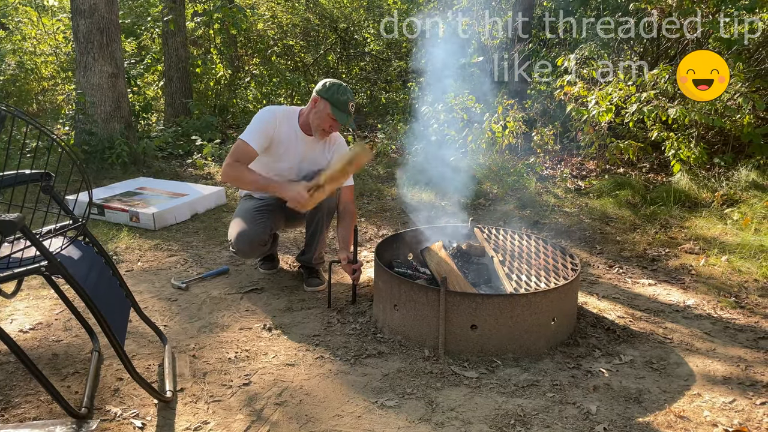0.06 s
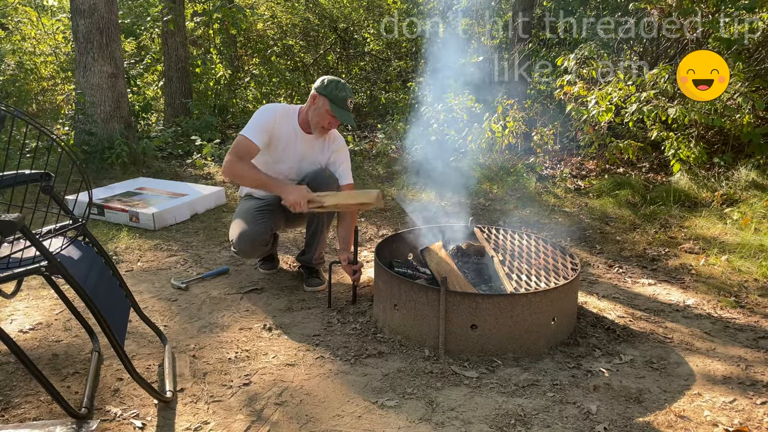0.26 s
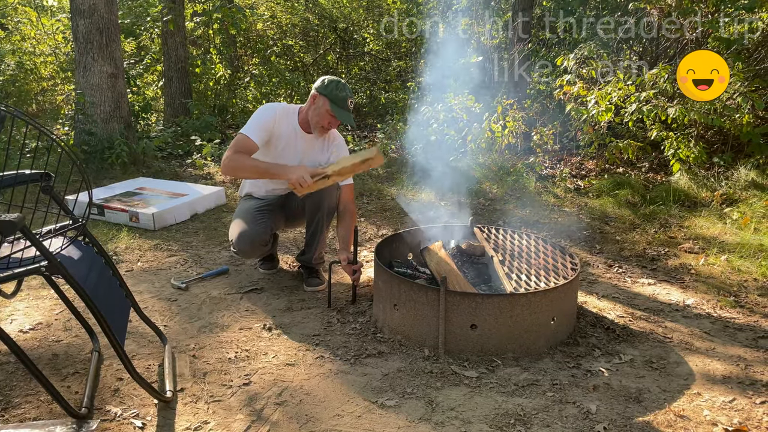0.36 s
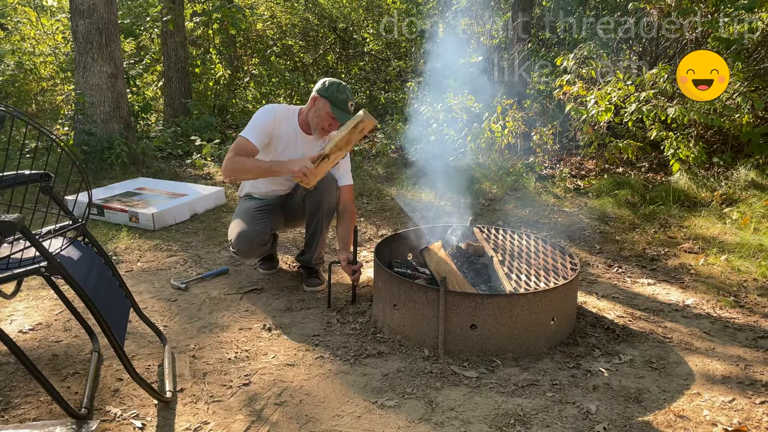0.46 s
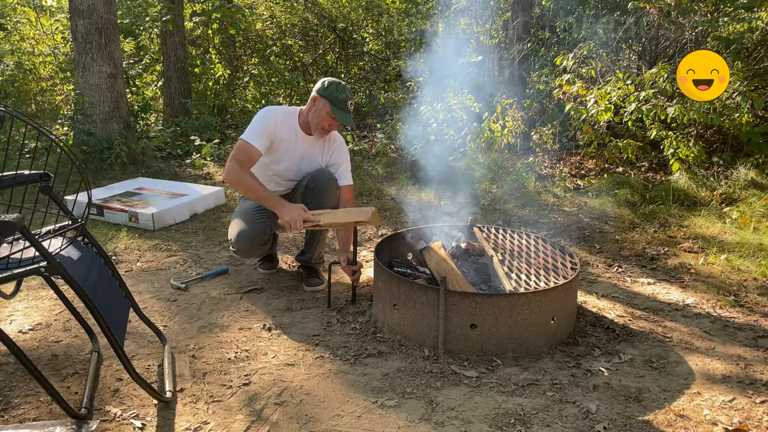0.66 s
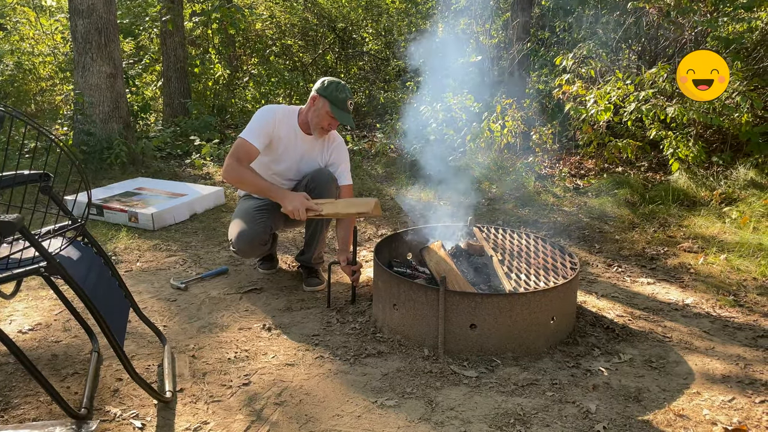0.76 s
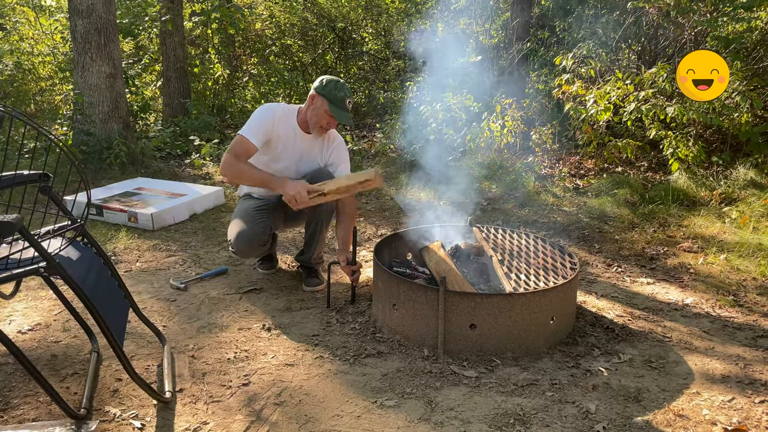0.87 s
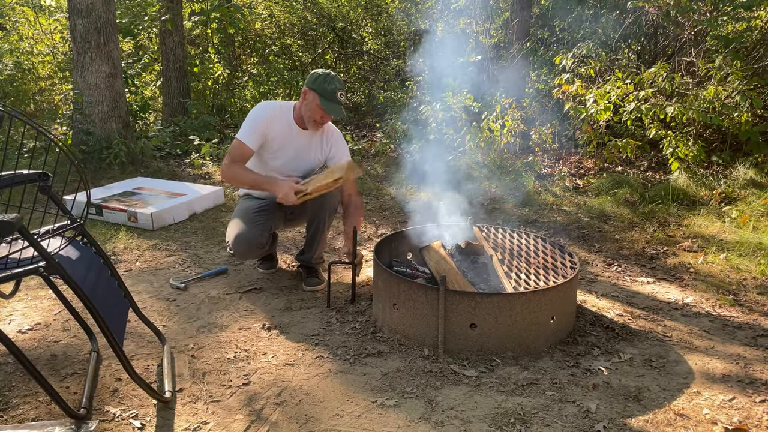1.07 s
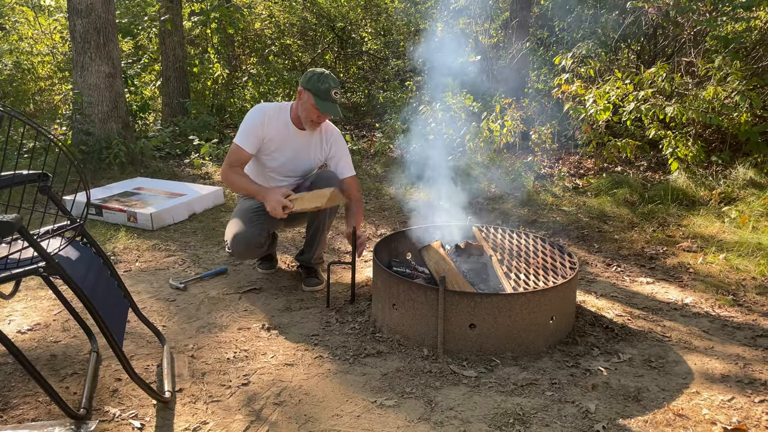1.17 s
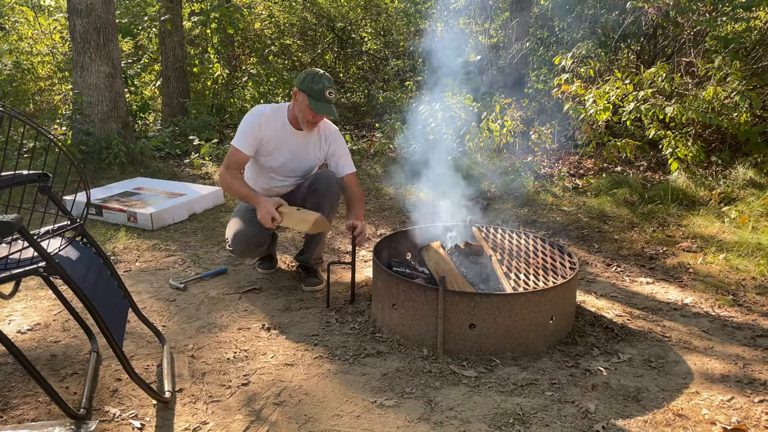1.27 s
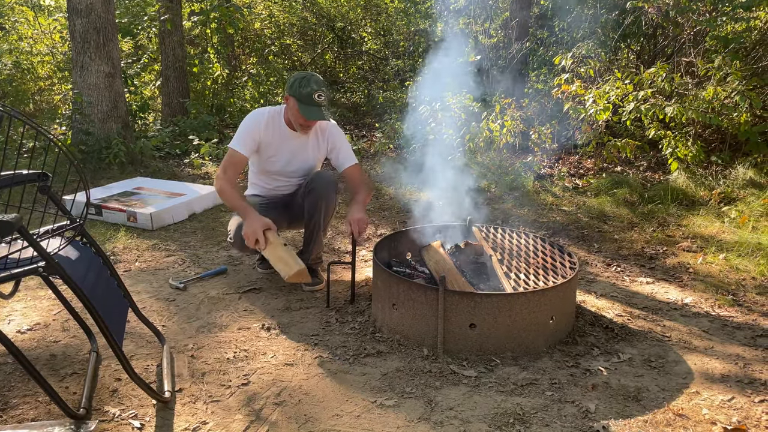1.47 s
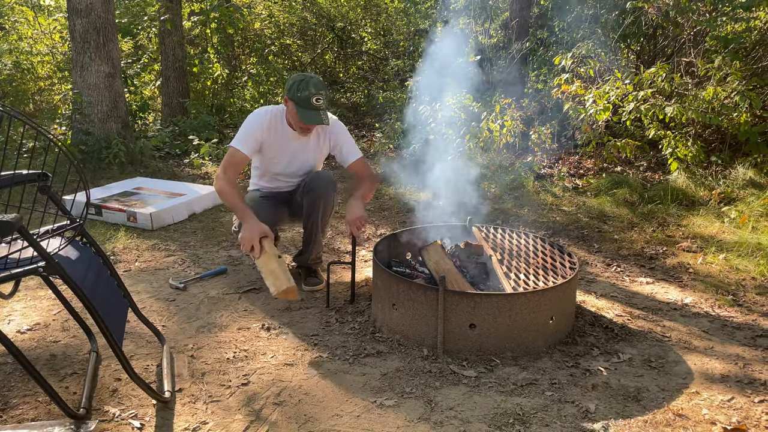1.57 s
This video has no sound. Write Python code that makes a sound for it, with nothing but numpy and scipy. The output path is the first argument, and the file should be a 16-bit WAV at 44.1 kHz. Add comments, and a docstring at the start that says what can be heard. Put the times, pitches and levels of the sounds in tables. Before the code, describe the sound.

A split log strikes a steel stake twice, half a second apart, the first blow brighter with a brief metallic ring; close, slightly overloaded microphone, short woodland echo, faint fire pops and crickets.

```python
"""Crickets chirr and a campfire ticks over a low rumble; they last throughout.
A split log knocks on a steel stake and drives it into the soil: the log clacks, the stake rings briefly,
the ground thuds and the trees answer. A faint scuff, a thin pop and a sharp snap of the fire lead to a
second knock; more pops and handling bumps follow. Struck bodies are decaying sines; the rest is shaped
noise. The blows are hard enough to overload the microphone."""
import sys
import numpy as np
from scipy import signal
from scipy.fft import rfft, irfft, next_fast_len
from scipy.io import wavfile
from scipy.ndimage import map_coordinates

SR = 44100
rng = np.random.default_rng(int(sys.argv[2]) if len(sys.argv) > 2 else 0)


def dump_mix(stems):
    """Bounce the given channels to the path in sys.argv[1] as a 16-bit WAV at rate SR."""
    frames = np.atleast_2d(stems).T  # one column per channel
    limited = np.clip(frames, -1, 1)  # hard clip at full scale
    pcm = np.round(limited * 32767).astype(np.int16)
    wavfile.write(sys.argv[1], SR, pcm)


N = 70560  # length in samples


def amp(db):
    """Turn decibels into linear gain."""
    return 10 ** (np.asarray(db) / 20)


def unit(x):
    """Scale to an rms of 1."""
    return x / np.sqrt(np.mean(x ** 2) + 1e-20)


def along(points, hz):
    """Interpolate (pitch_hz, value) points on a log frequency axis."""
    point_hz, value = np.transpose(points)
    return np.interp(np.log(hz + 1), np.log(point_hz + 1), value)


def colour(points):
    """Make a gain function of frequency from (pitch_hz, level_db) points."""
    return lambda hz: amp(along(points, hz))


def filtered(x, response):
    """Multiply the spectrum of x by a response, zero-padded against wrap-around."""
    size = next_fast_len(N + SR // 2)
    spectrum = rfft(x, size) * response(np.fft.rfftfreq(size, 1 / SR))
    return irfft(spectrum, size)[..., :N]


def noise(gain, spread):
    """Coloured stereo noise of rms 1; spread is the ratio of side to mid."""
    mid, side = filtered(rng.standard_normal((2, N)), gain)
    return unit(np.array([mid + spread * side, mid - spread * side]))


def wobble(rate):
    """A smooth random curve with the given number of knots per second."""
    knots = rng.standard_normal(int(N * rate / SR) + 4)
    return map_coordinates(knots, [np.arange(N) * rate / SR])


def since(start_s):
    """Seconds elapsed after start_s, zero before it."""
    return np.maximum(np.arange(N) / SR - start_s, 0)


def strike(start_s, attack_s, t60_s):
    """Envelope of a hit: a quick rise times an exponential decay of 60 dB in t60_s."""
    t = since(start_s)
    rise = 1 - np.exp(-t / attack_s)
    return rise * amp(-60 * t / t60_s)


def ring(modes, start_s, attack_s, tilt_db):
    """Damped sine modes of a struck body; a harder contact favours the high ones."""
    out = np.zeros(N)
    for hz, level_db, t60_s in modes:
        octaves = np.log2(max(hz / 900, 1))
        mode_db = level_db + rng.normal(0, 0.4) + tilt_db * octaves
        tone = np.sin(2 * np.pi * hz * since(start_s))
        out += amp(mode_db) * strike(start_s, attack_s, t60_s) * tone
    return out


def knocks():
    """Each blow is a graze and a noisy crack, then the modes of log, stake and soil ring."""
    # the blows: start_s, strength_db, stake_ring_db, crack_db, brightness_db_per_octave, log_pitch_ratio
    blows = [(0.2124, 1.5, 0, -4, 1.5, 0.996), (0.7311, 1, -7, -7, -0.5, 1.02)]
    # modes before brightness and blow strength: pitch_hz, level_db, t60_s
    log_modes = [(289.6, 8, 0.026), (325.8, 0.5, 0.039), (534.2, 16, 0.017), (644.6, 17.5, 0.015),
                 (828, 14.5, 0.016), (1440, -9.5, .023), (1429.4, 4, 0.021), (2274, 5, 0.011),
                 (3521, -18, 0.015)]  # pitch also shifts with each blow
    stake_modes = [(1205, -19, 0.091), (1623, -4.5, 0.039), (2822, -9, 0.025), (2858, -46.5, 0.18),
                   (2900, -43, 0.42), (4346, -8.5, 0.006), (6000, -30.5, 0.054)]  # damped by soil and hand
    soil_modes = [(73.5, -15, 0.19), (122, -7.5, 0.094), (171.2, -10, .1)]
    # colour of the crack: pitch_hz, level_db
    crack_colour = [(200, 8.5), (1000, 4.5), (2500, 1), (5500, -7.5), (8000, -14.5), (9500, -8.5),
                    (12000, -20.5), (15000, -24)]
    log_attack_s, stake_attack_s, soil_attack_s = 0.005, 0.0003, 0.014
    crack_t60_s = 0.019
    graze_lead_s, graze_db = 0.0017, -20  # splinters touch just before the full blow

    out = np.zeros((2, N))
    for start_s, strength_db, stake_db, crack_db, tilt_db, pitch_ratio in blows:
        shifted_log = [(hz * pitch_ratio, level_db, t60_s) for hz, level_db, t60_s in log_modes]
        log = ring(shifted_log, start_s, log_attack_s, tilt_db)
        stake = amp(stake_db) * ring(stake_modes, start_s, stake_attack_s, tilt_db)
        soil = ring(soil_modes, start_s, soil_attack_s, tilt_db)
        full_contact = amp(crack_db) * strike(start_s, 0.000071, crack_t60_s)
        graze = amp(graze_db) * strike(start_s - graze_lead_s, 0.00098, crack_t60_s)
        crack = (full_contact + graze) * noise(colour(crack_colour), spread=0.59)
        out += amp(strength_db) * (log + stake + crack + soil)
    return out


def fire():
    """Burning wood as short noise bursts: one sharp snap, thin pops and faint random ember ticks."""
    # thin pops: start_s, level_db
    pops = [(0.6368, -49), (0.8003, -43), (.954, -39.5), (1.085, -41.5), (1.135, -50), (1.274, -45),
            (1.294, -46)]
    # colour of snap and pops: pitch_hz, level_db
    pop_colour = [(300, -24.5), (1000, -25.5), (1700, -3.5), (6000, -1), (9000, -5), (12000, -8),
                  (16000, -22)]
    snap_s, snap_db, snap_t60_s = 0.6992, -19, 0.012
    pop_t60_s = 0.024
    thin_hz = 6044  # pops and embers lack the lower part of the sound
    embers_per_s, ember_floor_db = 32, -65.5

    count = int(embers_per_s * N / SR)
    embers = [(u * N / SR, ember_floor_db + 8 * v) for u, v in rng.random((count, 2))]
    snap = amp(snap_db) * strike(snap_s, 0.000296, snap_t60_s) * noise(colour(pop_colour), spread=0.56)
    ticks = sum(amp(level_db) * strike(start_s, 0.00015, pop_t60_s) for start_s, level_db in pops + embers)
    thin_noise = noise(lambda hz: colour(pop_colour)(hz) * hz / (hz + thin_hz), spread=0.9)
    return snap + ticks * thin_noise


def ports(x, lag_s):
    """Phase shift by frequency: sound reaches the left microphone port first, the right lag_s later."""
    side = np.array([[1], [-1]])
    return filtered(x, lambda hz: np.exp(1j * np.pi * hz * lag_s * side))


def woods(x):
    """Convolve with quick scatter from ground and fire ring, a wash and a blurred echo from the trees."""
    # colour of the nearby scatter, then of the far trees: pitch_hz, level_db
    near_colour = [(80, -10.5), (250, -2), (700, -4), (1500, -2.5), (2200, -11), (2870, 6), (3500, -7.5),
                   (6000, -0.5), (14000, -7.5)]
    far_colour = [(80, -11), (250, -4.5), (550, -4.5), (850, -5), (1100, 5), (1400, -7.5), (1650, -8),
                  (2200, -8), (2870, 5), (3500, -3), (14000, -4)]
    # decay of the far wash: pitch_hz, t60_s
    far_decay = [(150, 0.92), (700, 0.63), (2500, .45), (10000, 0.1)]
    near_db, near_t60_s = -17, 0.17
    far_db, far_rise_s = -32, 0.016
    echo_s, echo_db, echo_t60_s = 0.084, -34, 0.27  # the edge of the wood throws the blow back

    near = noise(colour(near_colour), spread=0.47) * strike(0, 0.001, near_t60_s)
    # the wash decays at its own rate in each frequency band
    hz, t, bands = signal.stft(noise(colour(far_colour), spread=0.61), SR, nperseg=256)
    decay = amp(-60 * t / along(far_decay, hz)[:, None])
    far = signal.istft(bands * decay, SR, nperseg=256)[1][:, :N]
    far = far * (1 - np.exp(-since(0) / far_rise_s))
    echo = noise(colour(far_colour), spread=1.0) * strike(echo_s, 0.0033, echo_t60_s)
    # each part is scaled by the energy of its left channel
    parts = [(near_db, near), (far_db, far), (echo_db, echo)]
    tail = sum(amp(level_db) * part / np.linalg.norm(part[0]) for level_db, part in parts)
    return signal.fftconvolve(x, tail, axes=1)[:, :N]


def handling():
    """Soft bumps and scuffs, each a noise burst in one broad resonance."""
    # handling of log and stake: start_s, level_db, t60_s, centre_hz, width_octaves
    bumps = [(.524, -49.5, 0.35, 1548, 0.504), (1.292, -60, 0.091, 2160, 0.25),
             (1.491, -30.5, 0.086, 226, 0.38), (1.492, -45, 0.029, 1350, 0.24),
             (1.501, -55.5, 0.17, 2014, 0.17)]
    out = np.zeros((2, N))
    for start_s, level_db, t60_s, centre_hz, width in bumps:
        body = noise(lambda hz: 1 / (1 + (np.log2((hz + 1) / centre_hz) / width) ** 4), spread=0.3)
        out += amp(level_db) * strike(start_s, 0.0013, t60_s) * body
    return out


def crickets():
    """A distant chorus of noise merges into a chirr; nearer singers pulse in narrow bands within it."""
    # colour of the chorus: pitch_hz, level_db
    chorus_colour = [(1290, -46.5), (2200, -14.5), (2410, -21.5), (2570, -13), (2860, -10), (3720, -4),
                     (4220, -1), (5750, -5), (6260, -1), (7190, -4), (8870, -15.5), (9650, -19),
                     (10800, -27.5), (14000, -32.5)]
    # course of the chorus before its trim: time_s, level_db
    chorus_level = [(0.0, -56), (1.394, -53), (1.6, -52)]
    # nearer singers: pitch_hz, level_db, pulses_per_s
    singers = [(3800, -63, 8.6), (4440, -71, 44), (6510, -65, 18)]
    trim_db, singer_width_hz = 2.5, 110
    chirr_knots_per_s, chirr_db = 60, 0.95  # fast random flutter of the level

    t = since(0)
    level_db = trim_db + np.interp(t, *np.transpose(chorus_level))
    flutter_db = chirr_db * wobble(chirr_knots_per_s)
    chorus = amp(level_db + flutter_db) * noise(colour(chorus_colour), spread=0.96)
    for pitch_hz, singer_db, rate in singers:
        # the random phase keeps the pulses slightly uneven
        pulses = unit(1 + 0.49 * np.sin(2 * np.pi * rate * t + wobble(10)))
        voice = noise(lambda hz: 1 / (1 + ((hz - pitch_hz) / singer_width_hz) ** 4), spread=0.8)
        chorus = chorus + amp(singer_db) * pulses * voice
    return chorus


def rumble():
    """Low, steady outdoor rumble of coloured noise."""
    # colour of the rumble: pitch_hz, level_db
    rumble_colour = [(15, -22.5), (45, -6.5), (72, 2), (110, -8), (150, -8), (250, -18.5), (450, -30),
                     (700, -31.5), (1000, -30.5), (1800, -39.5), (4000, -50)]
    return amp(-45.5) * noise(colour(rumble_colour), spread=0.52)


def scene():
    """Knocks and fire among the trees, over handling, crickets and rumble."""
    close = ports(knocks() + fire(), lag_s=0.00005)
    cricket_balance = amp([[-0.5], [0.5]])  # slightly louder on the right
    return close + woods(close) + handling() + crickets() * cricket_balance + rumble()


def record(dry):
    """The microphone saturates near full scale, then a steep low-pass removes the top."""
    top_hz = 15600
    clipped = dry / (1 + np.abs(dry) ** 12) ** (1 / 12)
    return filtered(clipped, lambda hz: 1 / (1 + (hz / top_hz) ** 60))


dry = scene()
out = record(dry)
dump_mix(out)
```